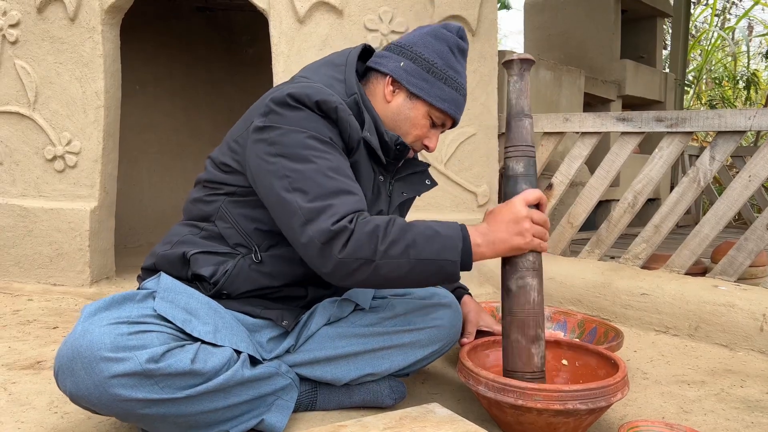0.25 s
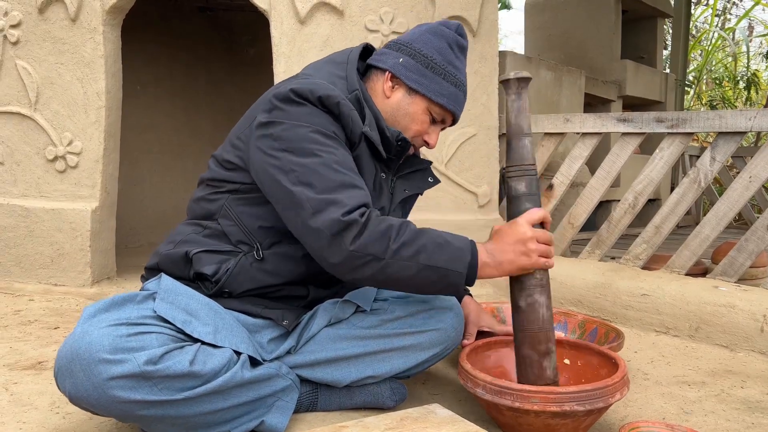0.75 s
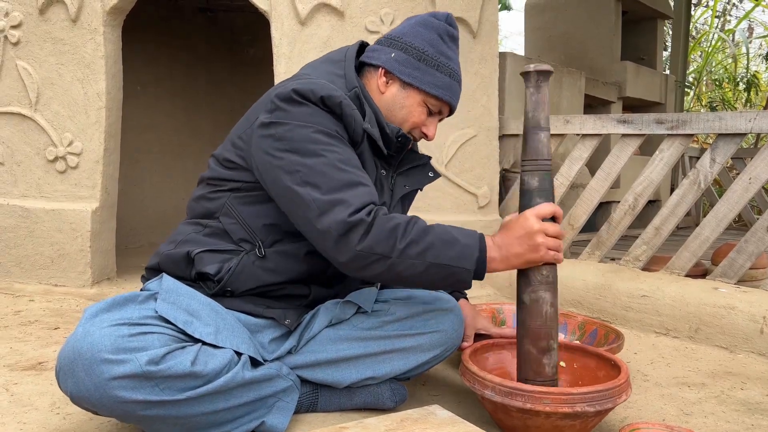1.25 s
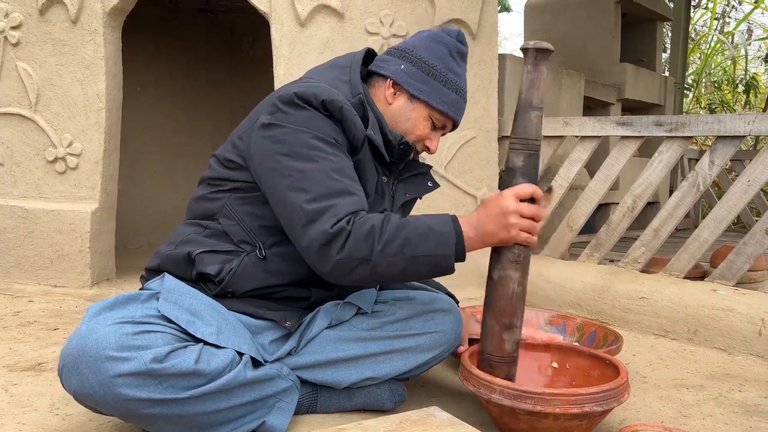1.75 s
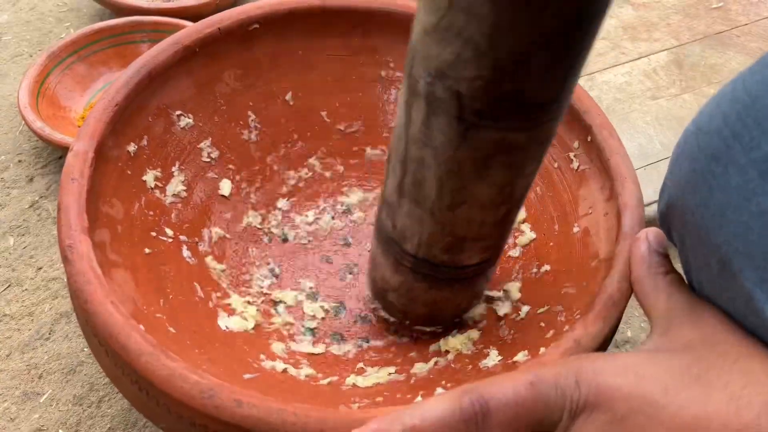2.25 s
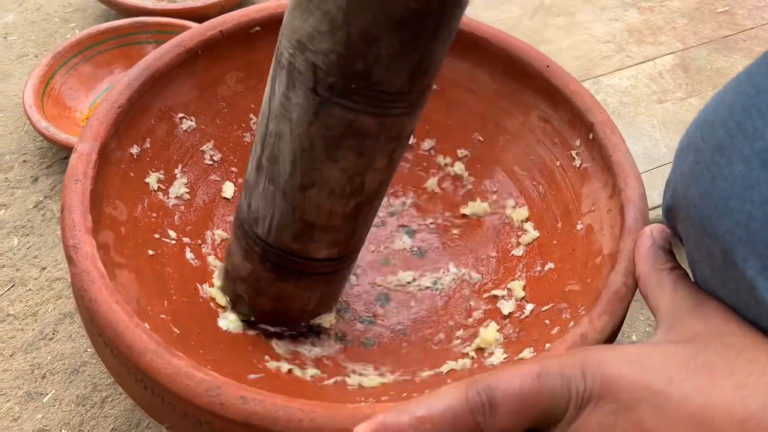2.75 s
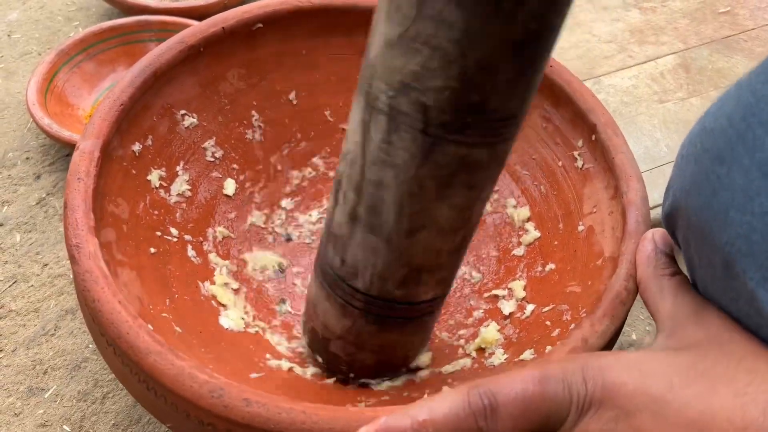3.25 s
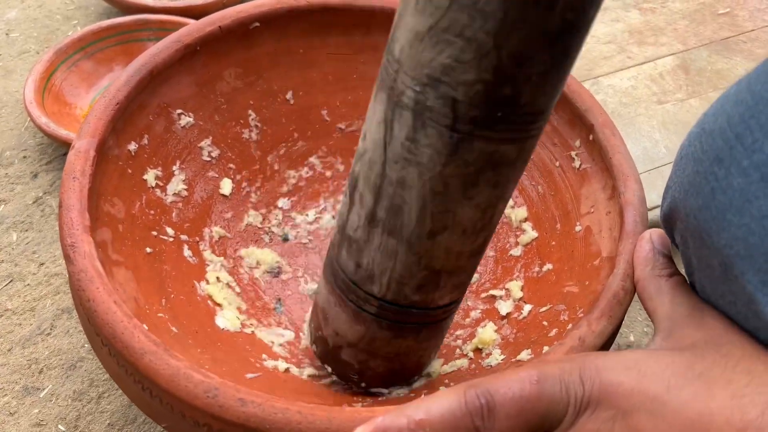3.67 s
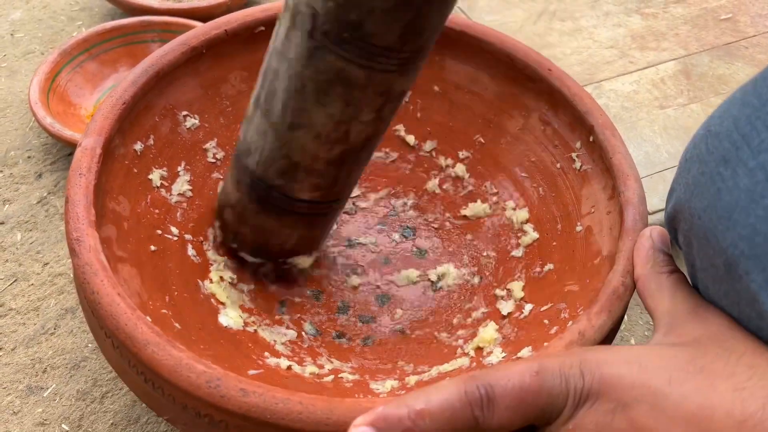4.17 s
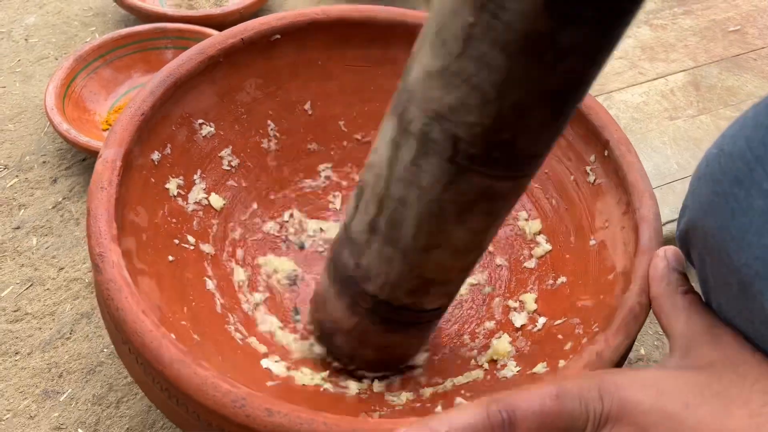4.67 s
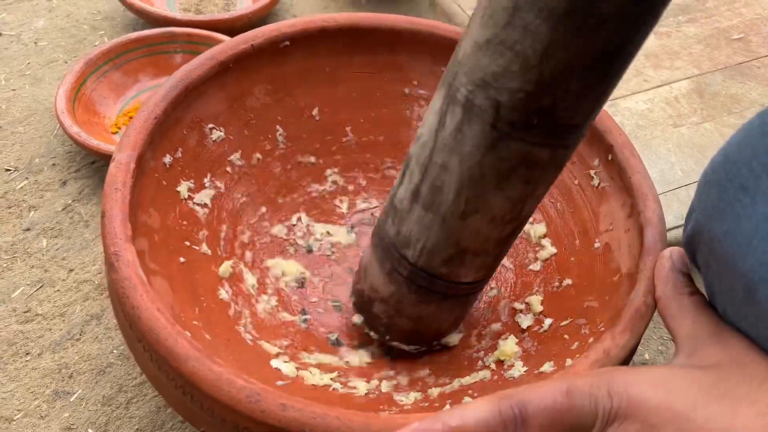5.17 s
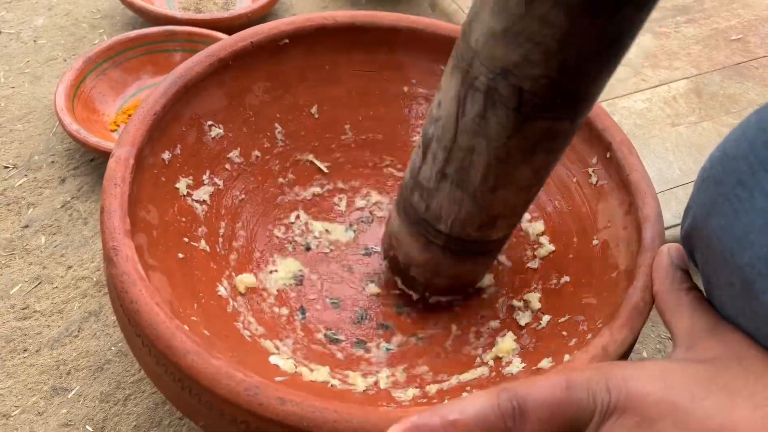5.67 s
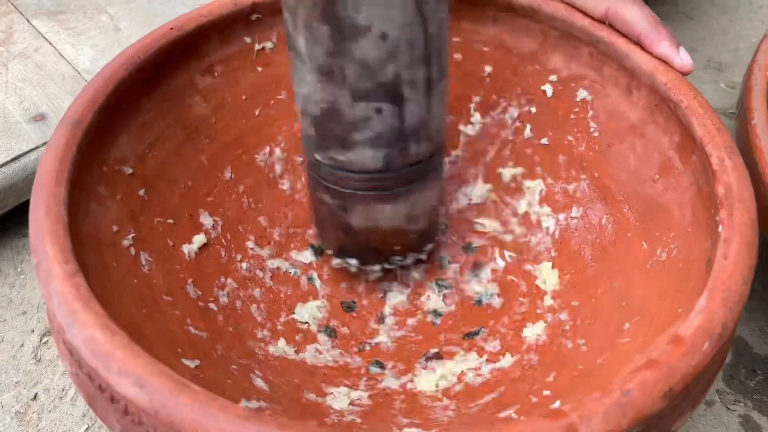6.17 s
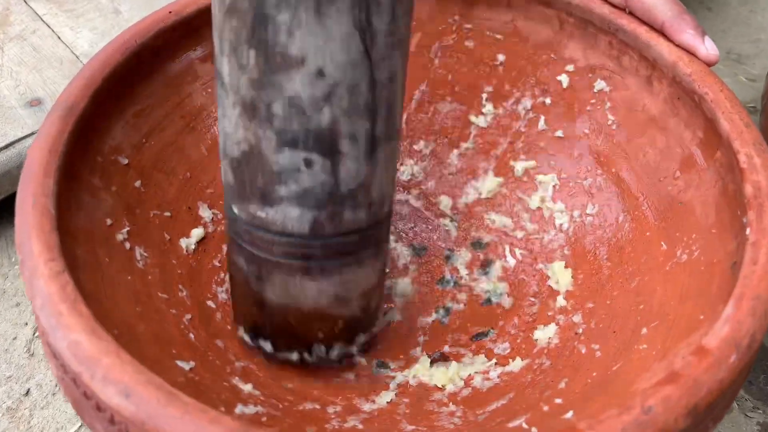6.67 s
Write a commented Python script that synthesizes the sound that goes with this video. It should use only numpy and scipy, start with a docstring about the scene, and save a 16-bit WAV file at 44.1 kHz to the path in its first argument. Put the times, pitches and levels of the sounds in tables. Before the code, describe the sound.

Close stereo sound of a heavy wooden pestle crushing garlic in a clay bowl on the ground in a quiet yard. From 0 to 1.5 s, uneven woody knocks hit bare clay: a modest one at 0.15, a hard bright crack at 0.7, a freely ringing one at 0.96 and a clattering double around 1.45, each with a short hollow ring near 550 Hz. From 1.9 to 4.4 s, blows come about every 0.2 s as dull cushioned thuds, with gritty rubbing, sticky crackle and tiny treble squirts, sharpest near 2.0; the firmest thud, with a crisp snap, lands at 3.25. From 4.4 to 5.8 s, pounding weakens into smearing, grinding and dry wall scrapes, with a wet spit at 5.07. At 5.86 s a brief singing skid and knocks ring the clay; soft rubbing and a faint knock at 6.4 follow, over barely audible air.

```python
"""Wet grinding, woody knocks with a clay ring and dull thuds: a heavy pestle works garlic in a clay bowl.
The bowl stands on the ground of a yard. Bare blows ring its modes; garlic cushions others to a thud.
Squirts and paste are clouds of tiny pops, and scrapes are random slips stirring resonances.
Two microphone ports hear it all with shifting balance and arrival gaps, scattered treble, a short
yard tail and faint outdoor air."""
import sys
import numpy as np
from scipy import signal
from scipy.fft import rfft, irfft, next_fast_len
from scipy.io import wavfile
from scipy.ndimage import uniform_filter1d

SR = 44100
rng = np.random.default_rng(int(sys.argv[2]) if len(sys.argv) > 2 else 0)


def master_out(mix):
    """Clip the mix to full scale and print it as 16-bit PCM to the path in sys.argv[1]."""
    frames = np.transpose(np.atleast_2d(mix))
    ceiling = np.clip(frames, -1, 1)
    pcm = np.round(ceiling * 32767).astype(np.int16)
    wavfile.write(sys.argv[1], SR, pcm)


N = 305172
TIME = np.arange(N) / SR
RING_TIME = TIME[:SR // 2]
PADDED = next_fast_len(N + SR, real=True)


def amp(db):
    """Decibels to gain."""
    return 10 ** (np.asarray(db) / 20)


def unit(x):
    """Scales to rms 1."""
    return x / np.sqrt(np.mean(x ** 2) + 1e-20)


def read(points, hz):
    """Reads a curve on a log-frequency axis."""
    f, value = np.transpose(points)
    return np.interp(np.log(hz + 1), np.log(f + 1), value)


def add(mix, s, sound):
    """Mixes a sound in at time s."""
    part = mix[max(round(s * SR), 0):][:len(sound)]
    part += sound[:len(part)]


def pulse(tone, size=4096):
    """The causal (minimum-phase) pulse with this spectrum shape, peak 1."""
    log_gain = np.log(amp(read(tone, abs(np.fft.fftfreq(size, 1 / SR)))))
    wave = np.fft.ifft(np.exp(np.conj(signal.hilbert(log_gain)))).real
    return wave / abs(wave).max()


def through(x, response):
    """Passes x through an impulse response."""
    return signal.oaconvolve(x, response)[:N]


def colour(x, tone):
    """Filters x by a table of gains over frequency."""
    gain = amp(read(tone, np.fft.rfftfreq(PADDED, 1 / SR)))
    return irfft(rfft(x, PADDED) * gain, PADDED)[..., :N]


def grains(per_s, spread_db, size=N):
    """Random clicks of either sign, most small and a few large."""
    sizes = amp(spread_db * np.minimum(rng.exponential(1, size), 4))
    heights = sizes * rng.choice([-1, 1], size)
    return heights * (rng.random(size) < per_s / SR)


def wander(points):
    """A random curve of rms 1, drawn as straight lines through so many points."""
    return unit(np.interp(TIME, np.linspace(0, TIME[-1], points), rng.standard_normal(points)))


def resonate(x, hz, width):
    """A resonance of gain about 1 that follows the curve hz."""
    turn = np.exp(2j * np.pi * np.cumsum(hz) / SR)
    r = np.exp(-np.pi * width / SR)
    return 2 * (turn * signal.lfilter([1 - r], [1, -r], x / turn)).real


# spectrum of the quiet yard: pitch_hz, level_db
YARD_AIR_TONE = [(20, -13.5), (60, 0.5), (150, -4), (300, -14), (700, -21.5), (2000, -20), (5000, -26),
                 (16000, -31.5)]


def air(air_db=-63, apart=0.99):
    """The faint outdoor background: noise partly shared by the two ports and partly their own."""
    noise = rng.standard_normal((3, N))
    return amp(air_db) * unit(colour(noise[:2] * apart + noise[2], YARD_AIR_TONE))


# presses of the pestle into the garlic, levels before each layer's own gain:
# peak_s, swell_s, fade_s, weight_db, grit_db (scrape), wet_db (crackle)
PRESSES = [(0.01, 0.12, 0.01, -39, -53, -41.5), (0.157, 0.006, 0.021, -33.5, -48, -41),
           (0.336, 0.029, 0.028, -36, -42, -46.5), (0.681, 0.0045, 0.065, -34.5, -49, -41.5),
           (0.758, 0.014, 0.035, -39.5, -44, -44.5), (0.962, 0.0052, 0.01, -26.5, -37, -43),
           (1.121, 0.027, 0.029, -33, -44.5, -42), (1.438, 0.0078, 0.084, -37.5, -45.5, -73),
           (1.558, 0.046, 0.032, -36.5, -50, -47), (1.821, 0.018, 0.011, -42.5, -51.5, -54),
           (1.927, 0.023, 0.034, -41, -38, -41), (1.985, 0.026, 0.009, -25, -42, -37),
           (2.081, 0.024, 0.01, -42, -64, -38), (2.14, 0.015, 0.026, -35, -45, -42),
           (2.296, 0.015, 0.049, -33.5, -38, -49), (2.364, 0.034, 0.0067, -34.5, -34.5, -49),
           (2.497, 0.0038, 0.028, -37.5, -38.5, -38.5), (2.699, 0.037, 0.022, -32.5, -39.5, -35.5),
           (2.903, 0.016, 0.029, -36, -44.5, -44.5), (3.078, 0.031, 0.019, -29, -33.5, -34.5),
           (3.244, 0.0098, 0.02, -31.5, -49, -62), (3.415, 0.026, 0.026, -33.5, -40.5, -35),
           (3.614, 0.0076, 0.039, -38.5, -42, -43.5), (3.779, 0.021, 0.024, -31, -40.5, -41.5),
           (3.974, 0.023, 0.018, -35, -43.5, -65), (4.118, 0.022, 0.07, -33.5, -42.5, -34.5),
           (4.313, 0.037, 0.085, -35, -40, -46.5), (4.41, 0.044, 0.059, -53, -51, -68),
           (4.496, 0.049, 0.071, -50, -45.5, -46.5), (4.634, 0.1, 0.046, -38.5, -41, -35),
           (4.726, 0.11, 0.054, -39, -41.5, -77), (4.891, 0.019, 0.087, -65, -46, -50),
           (4.977, 0.052, 0.012, -42.5, -44, -59), (5.073, 0.0059, 0.04, -33, -43, -38),
           (5.35, 0.079, 0.018, -49, -56.5, -44.5), (5.522, 0.1, 0.031, -43.5, -47.5, -42.5),
           (5.637, 0.093, 0.038, -44, -44, -73), (5.806, 0.062, 0.034, -46, -49.5, -41.5),
           (6.025, 0.074, 0.013, -40, -48, -47.5), (6.301, 0.15, 0.19, -55, -55, -72.5),
           (6.425, 0.029, 0.0085, -34, -45.5, -42), (6.669, 0.031, 0.012, -46.5, -69, -79)]
# between presses the pestle keeps dragging over the clay: time_s, level_db (before each layer's offset)
DRAG_LEVEL = [(0.0, -65), (0.55, -80), (1.75, -76), (2.1, -63), (3.0, -62.5), (3.19, -61.5), (3.55, -61.5),
              (4.05, -61), (4.45, -97), (4.9, -54), (5.7, -69), (6.15, -63.5), (6.45, -64), (6.77, -63),
              (6.81, -81)]
DRAG_WEIGHT_DB, DRAG_GRIT_DB, DRAG_WET_DB, DRAG_GROUND_DB = -9.5, 0.5, 9, 4.5  # layer offsets


def pressing(column, drag_db, lag_s=0, linger=1):
    """Gain of one side of the rubbing: each press swells and fades, adding its power to the drag."""
    power = amp(np.interp(TIME, *np.transpose(DRAG_LEVEL)) + drag_db) ** 2
    choice = ["weight", "grit", "wet"].index(column)
    for s, swell_s, fade_s, *levels_db in PRESSES:
        t = TIME - s - lag_s
        away = np.maximum(t / (fade_s * linger), -t / swell_s)
        near = away < 10
        power[near] += (amp(levels_db[choice]) * np.exp(-away[near])) ** 2
    return np.sqrt(power)


# dead thud of a cushioned blow: pitch_hz, level_db
CUSHIONED_TONE = [(40, -45), (120, -21), (230, -4), (340, 2), (480, -3), (600, -5.5), (800, -14.5),
                  (1100, -13.5), (1600, -41.5), (4000, -38)]
# the ground under the bowl: pitch_hz, level_db
GROUND_PUSH_TONE = [(20, -43), (45, -22.5), (65, -2.5), (110, -3.5), (190, -6), (320, -20.5), (1000, -62.5)]
# resonances that the sliding pestle stirs: pitch_hz, width_hz, level_db
SLIDING_MODES = [(550.3, 17, 27.5), (1186.5, 29.6, 20.5), (2033, 60, 17), (2105, 46, 13.5), (3105, 160, 16),
                 (3356, 40, 8), (4500, 150, -5.5)]
SCRAPE_DRIFT = 0.0029  # rms drift as a share of the pitch
# the ground takes the weight a little later and gives it back more slowly
GROUND_LAG_S, GROUND_LINGER = 0.0029, 1.37


def grinding(scrape_db=0, lumps_db=-3.0, ground_db=-2):
    """Grit catches in spurts and stirs resonances, while soft lumps rumble through bowl and ground."""
    body, ground = pulse(CUSHIONED_TONE), pulse(GROUND_PUSH_TONE)
    body, ground = body / np.linalg.norm(body), ground / np.linalg.norm(ground)
    spurts = unit(grains(900, 4.2) * amp(3.2 * wander(300)))
    slips = spurts * pressing("grit", DRAG_GRIT_DB)

    # each mode drifts, swells and fades as the pestle crosses its antinodes and nodes
    grit = np.zeros(N)
    for hz, width_hz, db in SLIDING_MODES:
        stirred = slips * amp(2 * wander(60))
        path_hz = hz * (1 + SCRAPE_DRIFT * wander(120))
        grit += amp(db) * resonate(stirred, path_hz, width_hz)

    lumps = unit(grains(350, 2)) * pressing("weight", DRAG_WEIGHT_DB)
    bumps = through(lumps, body)
    load = unit(grains(1000, 1.0)) * pressing("weight", DRAG_GROUND_DB, GROUND_LAG_S, GROUND_LINGER)
    sway = through(load, ground)
    return amp(scrape_db) * grit + amp(lumps_db) * bumps + amp(ground_db) * sway


# spectrum of bits snapping: pitch_hz, level_db
SKIN_AND_GRIT_TONE = [(300, -24), (900, 6), (1600, -2), (5000, -6.5), (9000, -11)]


def grit_ticks(tick_db=-7, per_s=110):
    """Single bits of skin and grit snap under the sliding pestle as sparse coloured clicks."""
    ticks = unit(colour(grains(per_s, 4), SKIN_AND_GRIT_TONE))
    return amp(tick_db) * ticks * pressing("grit", DRAG_GRIT_DB)


# spectrum of the wet crackle: pitch_hz, level_db
WET_PASTE_TONE = [(300, -35), (1500, -0.5), (3000, -0.5), (5000, 9), (7000, 6), (9000, 4), (12000, 3.5),
                  (16000, -1.5)]


def paste(crackle_db=-1, pops_per_s=3500):
    """Sticky paste crackles as it is smeared: dense pops whose size wanders in clumps."""
    pops = grains(pops_per_s, 3.6) * amp(3 * wander(700))
    return amp(crackle_db) * unit(colour(pops, WET_PASTE_TONE)) * pressing("wet", DRAG_WET_DB)


# modes of bowl and pestle: pitch_hz, level_db, t60_s (the second row is the main note)
BOWL_MODES = [(209.8, -11, 0.12), (546.2, -0.5, 0.39), (542, -11.5, 0.018), (807, 9, 0.021),
              (956, -26, 0.13), (1180, -11, 0.061), (1209, -2, 0.074), (1314, -13.5, 0.18),
              (1750, -36, 0.09), (2030, -32, 0.041), (2170, -20.5, 0.039), (2360, -15.5, 0.06),
              (3490, -29.5, 0.084), (4020, -39.5, 0.23), (4560, -37, 0.11)]


def bowl(hardness_db=0, detune=0.0044):
    """The ring of the clay: hardness (dB per octave) tilts the modes, the place of contact shifts high ones."""
    t, main_hz = RING_TIME, BOWL_MODES[1][0]
    shifts = 1 + detune * rng.standard_normal(len(BOWL_MODES))
    ring = np.zeros(len(t))
    for (hz, db, t60), shift in zip(BOWL_MODES, shifts):
        mode_hz = hz * shift if hz > 2 * main_hz else hz
        level_db = db + hardness_db * np.log2(hz / main_hz)
        ring += amp(level_db - 60 * t / t60) * np.sin(2 * np.pi * mode_hz * t)
    return ring


def thud(hz=450, swell_s=0.000894, sag=0.036):
    """The dead knock of the pestle's mass: a few cycles that swell, sink in pitch and die."""
    u = RING_TIME / swell_s
    turns = np.cumsum(hz * np.exp(-sag * (u - 4))) / SR  # passes hz at four swell times
    wave = u ** 3 * np.exp(-u) * np.sin(2 * np.pi * turns)
    return wave / abs(wave).max()


def chatter(fade_s, per_s=500):
    """Tiny repeated contacts of wood on clay keep shaking the bowl's upper modes."""
    contacts = grains(per_s, 0.71, size=len(RING_TIME)) * np.exp(-RING_TIME / fade_s)
    upper = signal.butter(4, 900, "high", fs=SR, output="sos")
    return signal.sosfilt(upper, through(contacts, bowl())[:len(RING_TIME)])


# wood on bare clay: start_s, level_db, hardness_db (per octave), free_s (until the leaning pestle
# damps the ring), damped_t60_s (of the added damping), thud_db and crack_db (against the ring)
BARE_BLOWS = [(0.1555, -19.5, -3, 0.06, 0.097, 3.5, -39), (.321, -38, 2, .3, 0.27, 15.5, -17),
              (.681, -12.5, 2, 0.038, 0.18, -0.5, -6), (.737, -24.5, -7.5, 0.074, 0.44, 5.5, -26),
              (.961, -21.5, 1, 0.45, .24, 6, -21), (1.109, -28, -8, 0.39, .24, 4, -6.5),
              (1.436, -15.5, -1, 0.002, 0.64, 6.5, -2), (1.466, -19, -1.5, 0.026, 0.074, -8, -20),
              (2.699, -32, -7, 0.072, 0.33, -8, -21), (5.084, -27.5, -5, 0.051, 0.24, 7.5, -31),
              (5.857, -25, 2.5, 0.025, 0.1, -13, -16), (5.8965, -23.5, 5, 0.03, 0.3, 9, -14),
              (6.410, -30, -5.5, 0.33, .24, 9, -28)]
# the wooden shaft's crack: pitch_hz, level_db
SHAFT_TONE = [(500, -32.5), (1100, 6), (1600, 4.5), (2500, -1.5), (3400, -14.5), (4200, -22), (9000, -41.5),
              (16000, -28.5)]


def knocks(rise_s=0.0029, thud_hz=540, clack_db=-14, clack_s=0.0014, tick_db=-21, crack_s=0.0028,
           rattle_db=-7, rattle_s=0.0042, chatter_db=-23, chatter_s=0.012):
    """A bare blow ticks, cracks, clacks, rattles and thuds; the bowl rings until the pestle smothers it."""
    out, t = np.zeros(N), RING_TIME
    wood = signal.butter(2, [550, 1900], "band", fs=SR)
    shaft = pulse(SHAFT_TONE)
    for s, db, hardness_db, free_s, damped_t60, thud_db, crack_db in BARE_BLOWS:
        damping = amp(-60 * np.maximum(t - free_s, 0) / damped_t60)
        ring = bowl(hardness_db) * (1 - np.exp(-t / rise_s)) * damping
        woody = unit(signal.lfilter(*wood, rng.standard_normal(len(t))))
        clack = woody * (np.exp(-t / clack_s) + amp(rattle_db) * np.exp(-t / rattle_s))
        tick = unit(signal.lfilter([1], [1, -.4], rng.standard_normal(len(t)))) * np.exp(-t / .002)
        crack = unit(through(rng.standard_normal(len(t)), shaft)[:len(t)]) * np.exp(-t / crack_s)
        contact = amp(hardness_db) * (amp(clack_db) * clack + amp(tick_db) * tick)
        contact += amp(crack_db) * crack
        shaking = amp(chatter_db) * chatter(chatter_s)
        add(out, s, amp(db) * (ring + contact + shaking + amp(thud_db) * thud(thud_hz)))
    return out


# blows cushioned by garlic: start_s, level_db (before the gain of each part)
CUSHIONED_BLOWS = [(.343, -37.5), (.745, -35), (0.774, -32), (.806, -34.5), (1.14, -31.5), (1.517, -29.5),
                   (1.545, -28.5), (1.555, -24.5), (1.916, -20.5), (1.928, -17.5), (1.938, -14),
                   (1.974, -22.5), (1.987, -22), (2.145, -27), (2.189, -32.5), (2.288, -21), (2.303, -17.5),
                   (2.345, -22), (2.359, -26.5), (2.497, -24), (2.700, -22), (2.888, -28), (2.931, -31),
                   (3.06, -22.5), (3.072, -21), (3.086, -30), (3.231, -14), (3.2467, -10.5), (3.411, -14.5),
                   (3.612, -27), (3.777, -18.5), (3.788, -22), (3.971, -20.5), (4.11, -19.5), (4.146, -23),
                   (4.311, -27), (4.323, -25), (4.348, -26), (4.373, -28.5), (4.402, -32), (4.608, -29.5),
                   (4.639, -24.5), (4.716, -32.5), (4.776, -36.5), (4.925, -44), (4.977, -51), (5.066, -28),
                   (5.309, -44), (5.431, -46), (5.471, -47), (5.518, -36.5)]


def thuds(blow_db=2, thud_hz=430, ring_db=-21, ring_tilt_db=-1, ring_rise_s=0.024,
          ground_db=-17, ground_lag_s=0.0039, crunch_db=-18, crunch_s=0.0041):
    """A clove gives way: a dead thud, a short crunch, a faint ring and a push into the ground."""
    out, t = np.zeros(N), RING_TIME
    ring = bowl(ring_tilt_db) * (1 - np.exp(-t / ring_rise_s))
    blow, body, ground = thud(thud_hz), pulse(CUSHIONED_TONE), pulse(GROUND_PUSH_TONE)
    for s, db in CUSHIONED_BLOWS:
        crunch = grains(680, 5.43, size=len(t)) * np.exp(-t / crunch_s)
        add(out, s, amp(db) * (amp(blow_db) * blow + amp(ring_db) * ring))
        add(out, s, amp(db + crunch_db) * through(crunch, body))
        add(out, s + ground_lag_s, amp(db + ground_db) * ground)
    return out


# juice squeezed from under the pestle: start_s, level_db (before doubling), fade_s
JUICE_SQUIRTS = [(1.511, -48, .003), (1.828, -44, 0.018), (1.974, -17.5, 0.0022), (1.982, -15, 0.0024),
                 (2.303, -33, 0.0033), (2.347, -26.5, 0.0036), (2.356, -34, 0.0047), (2.446, -36, 0.0067),
                 (2.696, -29, 0.0029), (3.2435, -30, 0.00072), (3.772, -36, 0.0063), (3.817, -32.5, 0.0073),
                 (3.961, -40.5, 0.0058), (4.108, -21, 0.0011), (4.115, -39, 0.0052), (4.143, -25, 0.0013),
                 (4.165, -34, 0.0036), (4.262, -34, 0.0013), (4.283, -31.5, 0.0041), (4.497, -40, 0.0013),
                 (4.586, -54, .002), (4.935, -49, 0.0016), (5.065, -19.5, 0.0025), (5.088, -36.5, 0.013),
                 (5.344, -34.5, 0.0023), (5.415, -39, 0.0018), (5.445, -39, 0.0022), (5.465, -31.5, 0.0045),
                 (5.79, -39, 0.0017)]


def squirts(gain_db=0, centre_hz=7000, octaves=0.74, pops_per_s=7000, spread_db=3,
            rise_s=0.000054, size=4096):
    """Juice and air burst out in a dense cloud of tiny pops around one treble band."""
    out, t, hz = np.zeros(N), TIME[:size], np.fft.rfftfreq(size, 1 / SR)
    band = 1 / (1 + (np.log2((hz + 1) / centre_hz) / octaves) ** 4) ** .5
    for s, db, fade_s in JUICE_SQUIRTS:
        fizz = unit(irfft(rfft(grains(pops_per_s, spread_db, size=size)) * band))
        envelope = np.exp(-t / fade_s) * (1 - np.exp(-t / rise_s))
        add(out, s, 2 * amp(db + gain_db) * fizz * envelope)
    return out


# a firm clove splits: start_s, level_db, pitch_hz (band centre), fade_s
CLOVE_SNAP = (3.2464, -17.5, 3800, .001)


def snap(width_hz=1500):
    """A clove splits with one crisp crack: a fading burst of noise in a band."""
    s, db, hz, fade_s = CLOVE_SNAP
    out, t = np.zeros(N), RING_TIME
    burst = unit(resonate(rng.standard_normal(len(t)), np.full(len(t), hz), width_hz))
    add(out, s, amp(db) * burst * np.exp(-t / fade_s))
    return out


# the pestle rides up the dry side of the bowl: start_s, length_s, level_db
SIDE_RIDES = [(4.17, 0.061, -47.5), (4.471, 0.12, -42), (4.6, .07, -55), (4.863, 0.12, -46.5),
              (5.294, 0.092, -50.5), (5.968, 0.039, -44.5)]
# resonances stirred from the side wall: pitch_hz, width_hz, level_db
SIDE_MODES = [(1005, 150, -2), (1324, 32, 3), (2340, 40, 0), (3850, 120, -5.5), (4790, 120, -2)]


def wall_scrapes(catches_per_s=600, spread_db=4):
    """Wood catches and slips on the dry side wall, which rings with its own set of notes."""
    push = np.zeros(N)
    for s, length_s, db in SIDE_RIDES:
        arch = np.sin(np.pi * np.clip((TIME - s) / length_s, 0, 1))
        push += amp(db) * np.sqrt(np.maximum(arch, 0))
    catches = unit(grains(catches_per_s, spread_db)) * push
    wall = np.zeros(len(RING_TIME))
    for hz, width_hz, db in SIDE_MODES:
        decay = np.exp(-np.pi * width_hz * RING_TIME)
        wall += amp(db) * width_hz * decay * np.sin(2 * np.pi * hz * RING_TIME)
    return through(catches, wall / np.linalg.norm(wall))


# the pestle skids on dry clay and makes the bowl sing: start_s, length_s, pitch_hz, level_db
SINGING_SKID = (5.8563, .052, 547, -12.3)


def skid(rise_s=.003, t60=.08, slips_db=-31, jitter=.008):
    """Stick and slip sing near the bowl's main note; the slips also shake its higher modes."""
    s, length_s, hz, db = SINGING_SKID
    out, t = np.zeros(N), RING_TIME
    unsteady = unit(uniform_filter1d(rng.standard_normal(len(t)), 200))
    turns = np.cumsum(hz * (1 + jitter * unsteady)) / SR
    envelope = (1 - np.exp(-t / rise_s)) * amp(-60 * np.maximum(t - length_s, 0) / t60)
    note = np.sin(2 * np.pi * turns) * envelope
    # one slip of random strength per cycle
    slips = np.diff(np.floor(turns), prepend=0) * (t < length_s) * rng.standard_normal(len(t))
    slips = signal.sosfilt(signal.butter(2, [900, 3600], "band", fs=SR, output="sos"), slips)
    add(out, s, amp(db) * note)
    add(out, s, amp(db + slips_db) * through(slips, bowl(1)))
    return out


# the ports' view of the bowl, as pestle and microphone move:
# start_s, balance_db (left minus right), lead_s (by which the left port leads)
PORT_VIEWS = [(0, -2.5, -.00005), (.6, -6, -.00007), (1.35, -2, -.00005), (1.795, -1.8, .00013),
              (5.85, 1.8, -.00024), (6.1, -.5, .0001)]


def ports(x):
    """Two microphone ports hear the bowl with a level and time gap that depends on their position."""
    hz, side, out = np.fft.rfftfreq(PADDED, 1 / SR), np.array([[.5], [-.5]]), 0
    position = np.searchsorted([row[0] for row in PORT_VIEWS[1:]], TIME)
    for k, (_, balance_db, lead_s) in enumerate(PORT_VIEWS):
        spectrum = rfft(x * (position == k), PADDED)
        out = out + spectrum * amp(side * balance_db) * np.exp(2j * np.pi * hz * side * lead_s)
    return irfft(out, PADDED)[:, :N]


# what the bowl's sides scatter before it reaches the ports: pitch_hz, level_db
SCATTER_TONE = [(250, -26), (600, -37.5), (1200, -15), (2500, -0.5), (4000, -3), (8000, -1.5),
                (16000, -0.5)]


def scatter(x, fade_s=0.0016, count=5):
    """The bowl's sides scatter the treble along random short paths, different at each port."""
    place = np.arange(N) / SR / .13  # a new place every 0.13 s
    t, out = RING_TIME[:SR // 40], 0
    for k in range(count):
        # neighbouring places crossfade, and the set of places repeats
        share = np.cos(np.pi / 2 * np.minimum(abs((place - k) % count - 1), 1))
        paths = rng.standard_normal((2, len(t))) * np.exp(-t / fade_s)
        out = out + np.array([through(x * share, h / np.linalg.norm(h)) for h in paths])
    return colour(out, SCATTER_TONE)


# decay of the yard's tail: pitch_hz, t60_s
YARD_DECAY = [(200, 0.037), (2000, 0.26), (16000, 0.0065)]
# what ground and walls return: pitch_hz, level_db
YARD_TONE = [(500, -9.5), (2000, -14.5), (14000, -16)]


def yard(x):
    """Ground and walls return a short tail, different at each port: random taps that decay by band."""
    taps = np.array([grains(3000, 1, size=SR // 2) for _ in range(2)]) * (RING_TIME > .002)
    hz, t, z = signal.stft(taps, SR, nperseg=256)
    decay = amp(-60 * t / read(YARD_DECAY, hz)[:, None])
    tails = signal.istft(z * decay, SR, nperseg=256)[1]
    return colour(np.array([through(x, h / np.linalg.norm(h)) for h in tails]), YARD_TONE)


# what reaches the ports straight: pitch_hz, level_db
DIRECT_TONE = [(500, -0.5), (1200, -1), (2500, -13), (5000, -11.5), (16000, -13)]
# the wall flexes, so part of the rubbing reaches the ports with opposite sign: pitch_hz, level_db
FLEX_TONE = [(60, -32), (250, -13), (600, -3.5), (1400, -8.5), (4000, -26), (16000, -18)]


def scene():
    """Everything that happens in the bowl, heard by two ports in the yard."""
    blows = knocks() + skid() + thuds() + snap() + squirts()
    rubbing = grinding() + wall_scrapes() + grit_ticks() + paste()
    mortar = blows + rubbing
    flex = colour(grinding(), FLEX_TONE)  # its own random draw of the rubbing
    direct = ports(colour(mortar, DIRECT_TONE))
    return direct + np.array([flex, -flex]) + scatter(mortar) + yard(mortar) + air()


# the microphone's colour: pitch_hz, level_db
MICROPHONE_TONE = [(20, 2.5), (9000, 0.5), (10300, -7.5), (11500, -1), (12800, -10), (14000, -15),
                   (15400, 2), (17000, -25.5)]
EDGE_HZ = 16500


def record(dry):
    """The microphone's colour, then the band limit as a steep low-pass."""
    edge = signal.firwin(511, EDGE_HZ, window=("kaiser", 9), fs=SR)
    return signal.oaconvolve(colour(dry, MICROPHONE_TONE), edge[None], "same")


dry = scene()
out = record(dry)
master_out(out)
```